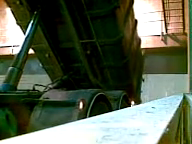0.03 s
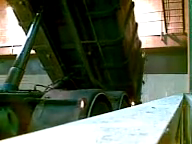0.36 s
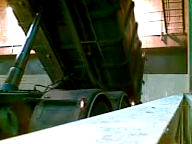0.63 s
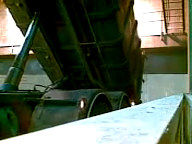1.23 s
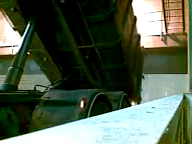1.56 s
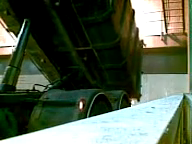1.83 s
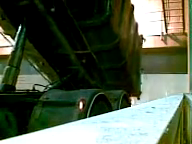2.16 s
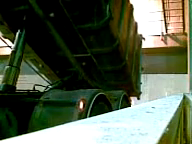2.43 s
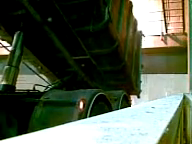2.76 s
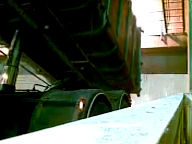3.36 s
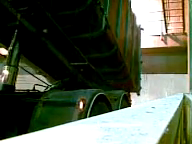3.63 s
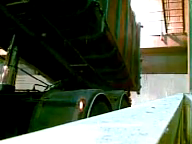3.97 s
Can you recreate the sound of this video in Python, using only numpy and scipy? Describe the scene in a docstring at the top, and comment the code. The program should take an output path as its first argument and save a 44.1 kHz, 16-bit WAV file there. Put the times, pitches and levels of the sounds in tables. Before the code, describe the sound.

A tipper truck's diesel engine knocks and surges as its steel container bangs and booms.

```python
"""A diesel engine knocks and surges as a tipper truck raises its steel container inside a hall.
The knock hardens whenever the engine takes fuel, and a gear whine follows its rising and sagging speed.
The shifting container booms and clanks in clusters of blows, which echo around the hall.
Everything sounds narrow, as over a telephone, and the recorder overloads on the loudest bangs."""
import sys
import numpy as np
from scipy import signal
from scipy.fft import rfft, irfft
from scipy.io import wavfile

SR = 44100
rng = np.random.default_rng(int(sys.argv[2]) if len(sys.argv) > 2 else 0)


def bounce(signal):
    """Save signal as a 16-bit WAV file at the path given by the first command-line argument."""
    frames = np.transpose(np.atleast_2d(signal))
    limited = np.clip(frames, -1, 1)
    pcm = np.round(limited * 32767).astype(np.int16)
    wavfile.write(sys.argv[1], SR, pcm)


N = 176400
T = np.arange(N) / SR
RING_SAMPLES = 49152


def from_db(db):
    """Turn decibels into a number to multiply a sound by."""
    return 10 ** (np.asarray(db) / 20)


def rms_one(x):
    """Scale a signal so that its average size (rms) is 1."""
    return x / np.sqrt(np.mean(x ** 2) + 1e-20)


def curve(rows):
    """Join (time, value) rows by straight lines."""
    return np.interp(T, *np.transpose(rows))


def at_hz(points, hz):
    """Read between (frequency, value) rows, giving each octave equal room."""
    freqs, values = np.transpose(points)
    return np.interp(np.log(np.maximum(hz, 1)), np.log(freqs), values)


def noise(spectrum):
    """Steady noise with a given tone colour and an average size of 1."""
    hz = np.arange(N // 2 + 1) * SR / N
    white = rfft(rng.standard_normal(N))
    return rms_one(irfft(white * from_db(at_hz(spectrum, hz)) * (hz > 20), N))


def drift(hz):
    """A random wobble of average size 1, mostly slower than hz."""
    freqs = np.arange(N // 2 + 1) * SR / N
    return rms_one(irfft(rfft(rng.standard_normal(N)) / (1 + (freqs / hz) ** 2), N))


def low_pass(x, hz, order=2):
    """Soften everything above hz; a higher order cuts more steeply."""
    return signal.sosfilt(signal.butter(order, min(hz, SR / 3), fs=SR, output="sos"), x)


def high_pass(x, hz):
    """Soften everything below hz."""
    return signal.sosfilt(signal.butter(2, hz, "high", fs=SR, output="sos"), x)


def add(out, start_s, x):
    """Mix a sound in at a given time."""
    i = int(start_s * SR)
    out[i:i + len(x)] += x[:N - i]


def dying_noise(spectrum, t60s):
    """Countless tones struck at once: bands of noise, each fading by 60 dB in its own time (t60)."""
    hz = np.arange(RING_SAMPLES // 2 + 1) * SR / RING_SAMPLES
    edges_hz = np.array([25, 150, 350, 800, 1800, 5000])
    whole = rfft(rng.standard_normal(RING_SAMPLES)) * from_db(at_hz(spectrum, hz))
    bands = np.array([irfft(whole * (hz >= lo) * (hz < hi)) for lo, hi in zip(edges_hz, edges_hz[1:])])
    t60 = at_hz(t60s, np.sqrt(edges_hz[:-1] * edges_hz[1:]))
    fades = np.exp(-np.log(1000) * T[:RING_SAMPLES] / t60[:, None])
    return np.sum(bands * fades, axis=0) / bands.sum(axis=0).std()


def ring(tones, stretch):
    """Struck steel rings in fading pure tones, a little different on each hit."""
    t = T[:RING_SAMPLES]
    out = np.zeros(RING_SAMPLES)
    for hz, db, t60 in tones:
        strength = rng.choice([-1, 1]) * from_db(db + 2 * rng.normal())
        out += strength * np.sin(2 * np.pi * hz * t) * np.exp(-np.log(1000) * t / (t60 * stretch))
    return out


def engine(speed):
    """Each firing rattles the engine block, along with a hiss, a smooth rush and the gears."""
    # strength of the knock, which follows the fuel: (time [s], level [dB])
    knock_levels = [(0, -31), (.06, -21), (.15, -21.5), (.25, -25), (.35, -27.5), (.65, -30), (.85, -36),
                    (1.13, -30.5), (1.18, -21.5), (1.3, -22), (1.42, -26), (1.48, -21.5), (1.65, -23),
                    (1.72, -29), (1.97, -36.5), (2.08, -25), (2.45, -33.5), (2.6, -29.5), (2.8, -32),
                    (3.13, -35), (3.25, -25), (3.55, -27), (3.92, -28), (4, -33)]
    # tone colour of the knock in the block: (frequency [Hz], level [dB])
    block_colour = [(100, -38), (300, -15), (600, -13), (830, -0.5), (1000, -2), (1200, 1.5), (1400, -4.5),
                    (1600, -1.5), (1800, -3.5), (1980, -1.5), (2500, -7.5), (3300, -15)]
    # swells of the high hiss: (time [s], level [dB])
    hiss_levels = [(0, -49), (.12, -49), (.35, -42), (.47, -40), (.72, -25.5), (.95, -43.5), (1.27, -28.5),
                   (1.67, -34), (1.97, -48), (2.07, -30.5), (2.82, -31.5), (3.05, -37.5), (3.4, -30.5),
                   (3.55, -40), (3.78, -25.5), (4, -60)]
    # tone colour of the hiss: (frequency [Hz], level [dB])
    hiss_colour = [(1000, -25), (2000, -6), (2500, 1.5), (3200, 3), (3800, -2)]
    # rush of fan, exhaust and oil: (frequency [Hz], level [dB])
    rush_colour = [(25, -33.5), (55, -6.5), (110, -5.5), (200, -6.5), (300, 0), (600, 3), (1000, 1.5),
                   (1500, -6.5), (2000, -9.5), (2600, -1), (3300, -11)]
    rise_s, decay_s, throb_floor = .003, .0072, .34
    firings = np.cumsum(speed) / SR + 0.11
    since_firing = firings % 1 / speed
    strength = from_db(1.58 * rng.standard_normal(256))[firings.astype(int)]  # no two firings alike
    burst = strength * (1 - np.exp(-since_firing / rise_s)) * np.exp(-since_firing / decay_s)
    clatter = from_db(1.6 * drift(hz=159))
    throb = rms_one(np.hypot(burst, throb_floor) * clatter)
    knock = noise(block_colour) * from_db(curve(knock_levels) + 1.5 * drift(hz=12))  # swells unevenly
    hiss = noise(hiss_colour) * from_db(curve(hiss_levels))
    rush_db = -34 + 0.38 * (speed - speed.mean())  # faster is louder
    rush = noise(rush_colour) * from_db(rush_db + 1.4 * drift(hz=25))
    return throb * (knock + hiss) + rush + gears(speed, throb)


def gears(speed, throb):
    """Meshing teeth whine in step with the engine; under load their case rattles with each firing."""
    # how hard the gears are loaded: (time [s], load [dB])
    loads = [(0, -36), (.12, -25), (.2, -26.5), (.3, -37.5), (.7, -37.5), (.88, -31.5), (1.14, -36.5),
             (1.152, -28.5), (1.19, -22.5), (1.25, -28.5), (1.35, -25), (1.65, -31.5), (1.87, -26.5),
             (2.08, -41), (2.3, -22.5), (2.45, -42.5), (2.73, -32), (3.03, -33.5), (3.3, -48), (4, -47)]
    # tone colour of the gear case: (frequency [Hz], level [dB])
    case_colour = [(500, -42), (720, -14.5), (830, -1.5), (1000, -1), (1170, -6.5), (1400, -22),
                   (2000, -40)]
    teeth_per_firing, haze, haze_hz = 31, .71, 15  # haze blurs the pure tone
    load_db = curve(loads)
    from_peak_db = load_db - load_db.max()
    angle = 2 * np.pi * teeth_per_firing * np.cumsum(speed) / SR
    tone = (1 + haze * drift(haze_hz)) * np.sin(angle) + haze * drift(haze_hz) * np.cos(angle)
    flutter = from_db(2 * drift(hz=19))
    whine = rms_one(tone * flutter) * from_db(-27.5 + .6 * from_peak_db)
    rattle = throb * noise(case_colour) * from_db(load_db.max() - 1.5 + 1.4 * from_peak_db)
    return whine + rattle


def container():
    """Blows set the steel walls booming, softer contacts more dully, over a deep chassis thud."""
    # blows: (time [s], level [dB], bass cut [Hz], treble cut [Hz], ring time stretch [factor])
    blows = [(.39, -10, 341, 880, 2.05), (.418, -17, 482, 1500, 0.75), (.565, -15.5, 300, 740, 0.86),
             (1.36, -24, 260, 800, 2.03), (1.74, -8.5, 147.6, 2400, 0.72), (1.752, -9, 448, 3400, 0.29),
             (2.157, -5.5, 171, 1500, 0.79), (2.184, -9, 660, 3300, 0.86), (2.238, -12.5, 200, 2090, 1.26),
             (2.303, -16.5, 454, 2100, 0.43), (2.565, -21.5, 238, 1981, .8), (2.863, -16, 161.5, 830, 0.8),
             (2.891, -14.5, 165, 2200, 0.39), (2.92, -18, 69.3, 3000, 0.61), (3.558, -30, 111, 686, 2.0)]
    # main tones of the walls: (frequency [Hz], level [dB], fade time before stretching [s])
    wall_tones = [(168.75, -12.5, 0.44), (223, -10.5, 0.32), (279.5, -1.5, 0.2), (370, -17, 0.084),
                  (420, -15.5, 0.49), (451.8, -3.5, .3), (585, -12, 0.26), (629.7, -8, 0.16),
                  (729.5, -4.5, 0.1), (837, -11.5, 0.32), (1036, -10.5, 0.46), (1580, -6.5, 0.13)]
    # the crowd of lesser panel tones: (frequency [Hz], level [dB])
    panel_colour = [(35, -10), (60, -7.5), (120, -7), (200, -2), (400, 1), (800, -1.5), (1400, -3),
                    (2400, -7.5), (3500, -3.5)]
    # how long the panels ring: (frequency [Hz], fade time before stretching [s])
    panel_fades = [(60, .6), (250, 0.45), (1000, 0.4), (3500, 0.3)]
    rise_s = .0033
    attack = 1 - np.exp(-T[:RING_SAMPLES] / rise_s)
    out = np.zeros(N)
    for start_s, db, low_hz, bright_hz, stretch in blows:
        panels = dying_noise(panel_colour, [(hz, t60 * stretch) for hz, t60 in panel_fades])
        body = attack * (from_db(1.5) * panels + from_db(-5) * ring(wall_tones, stretch))
        boom = low_pass(high_pass(body, low_hz), bright_hz)
        thud = .22 * low_pass(body, hz=101)
        add(out, start_s, from_db(db) * (boom - thud))
    return out


def hall(x):
    """The building throws back a smeared echo that lasts longest in the bass."""
    # how long the hall rings: (frequency [Hz], fade time [s])
    echo_fades = [(60, 1.4), (300, 2.36), (1000, 0.79), (3500, 0.48)]
    tail = dying_noise([(100, 1), (3000, -5.8)], echo_fades)
    tail /= np.sqrt(np.sum(tail ** 2) * SR / 10000)
    echo = np.zeros(N)
    add(echo, start_s=.023, x=tail)
    return from_db(-11.5) * signal.fftconvolve(x, echo)[:N]


def fittings():
    """Steel fittings clash twice in quick succession as one hard blow lands."""
    # clashes: (time [s], level [dB])
    clanks = [(1.747, -15), (1.7555, -8)]
    # tones of a fitting: (frequency [Hz], level [dB], fade time [s])
    fitting_tones = [(836, -1.5, 0.055), (1996, 1, 0.054), (2095, -6, 0.041), (2440, -6.5, 0.078)]
    out = np.zeros(N)
    for start_s, db in clanks:
        add(out, start_s, from_db(db) * ring(fitting_tones, stretch=1))
    return out


def scene():
    """The engine, the bangs and the echo of the bangs, in one channel."""
    # engine speed: (time [s], firings [per second])
    speeds = [(0, 29.14), (.2, 33.15), (.4, 35.53), (.68, 36.63), (.85, 34.72), (1, 32), (1.14, 30.66),
              (1.33, 33.14), (1.48, 33.9), (1.6, 36.3), (1.76, 36.3), (1.9, 33.22), (2.07, 31), (2.3, 33.2),
              (2.52, 32.85), (2.74, 33.5), (3, 32.95), (3.18, 29.3), (3.45, 29.9), (3.7, 31.4), (4, 31.4)]
    bangs = container() + fittings()
    return (engine(curve(speeds)) + bangs + hall(bangs))[None]


def record(dry):
    """Cut the treble like a telephone, flatten the loudest peaks, then trim the very top."""
    narrow = low_pass(dry, hz=3310, order=12)
    narrow = low_pass(narrow, hz=4340, order=24)
    overload_limit, top_hz = .71, 15900
    overloaded = np.clip(narrow, -overload_limit, overload_limit)
    return signal.sosfilt(signal.cheby2(12, 70, top_hz, fs=SR, output="sos"), overloaded)


dry = scene()
out = record(dry)
bounce(out)
```